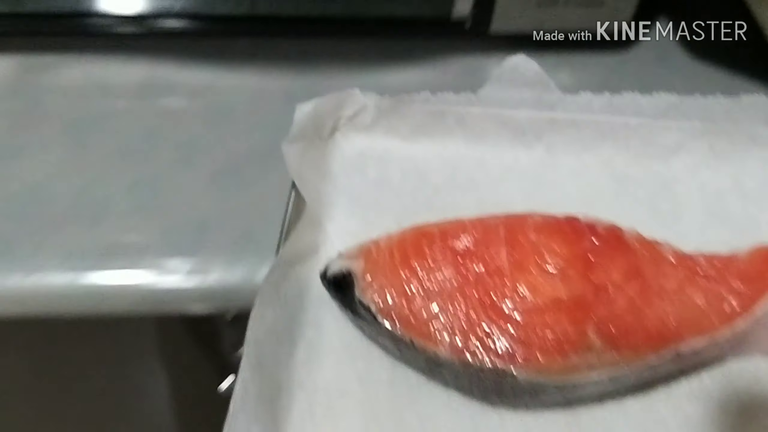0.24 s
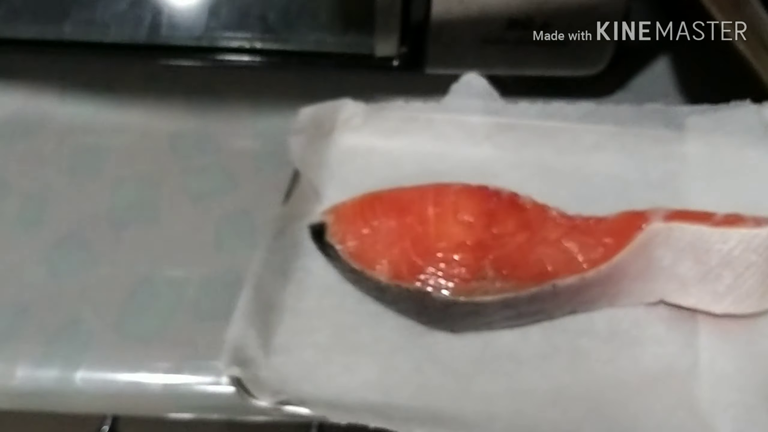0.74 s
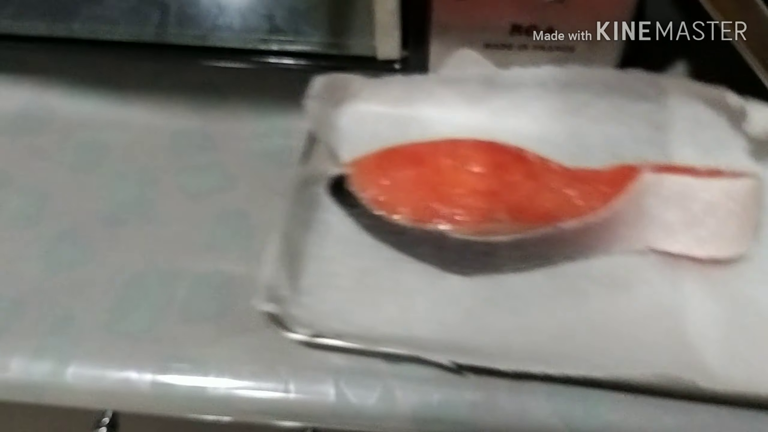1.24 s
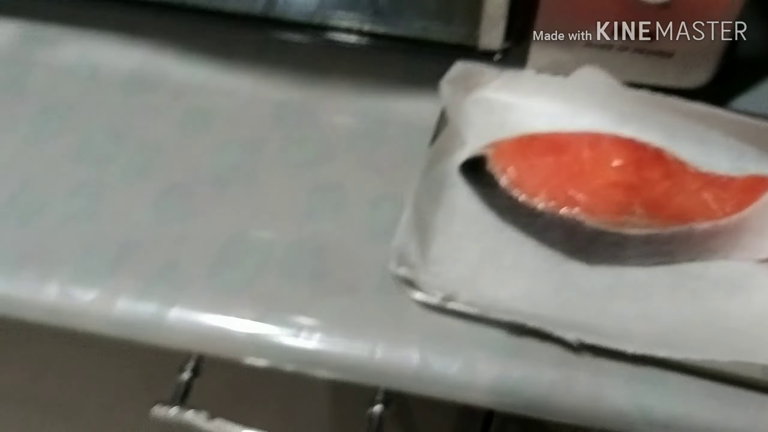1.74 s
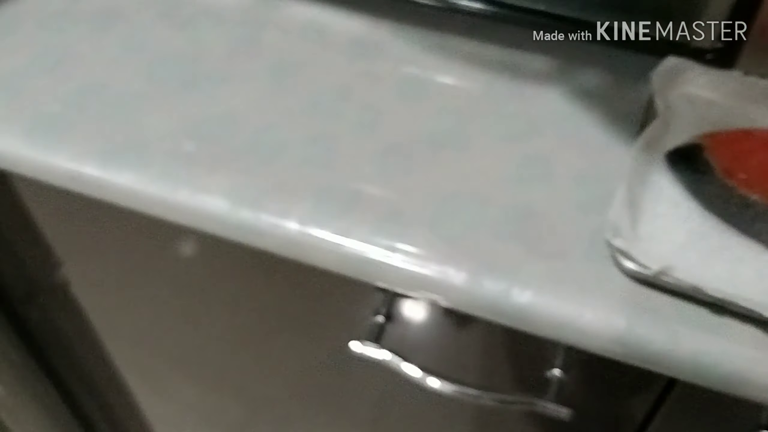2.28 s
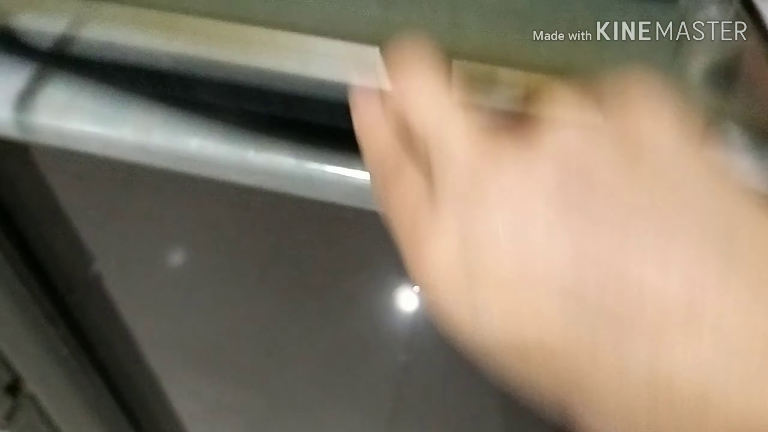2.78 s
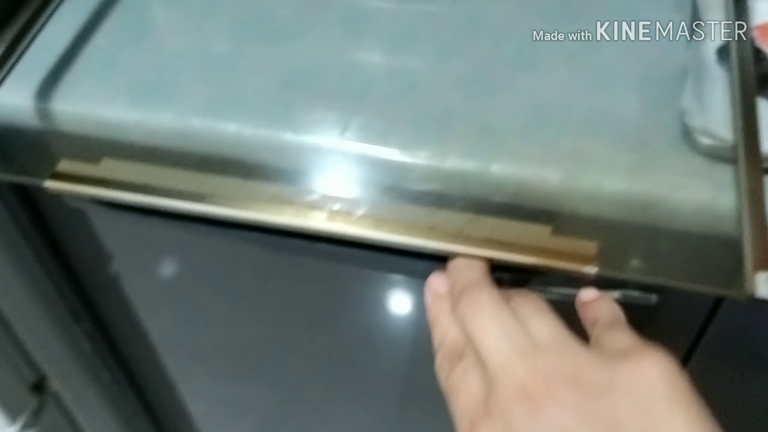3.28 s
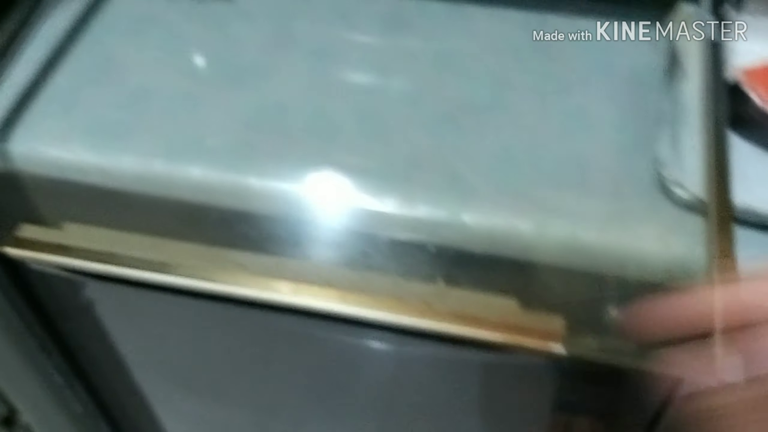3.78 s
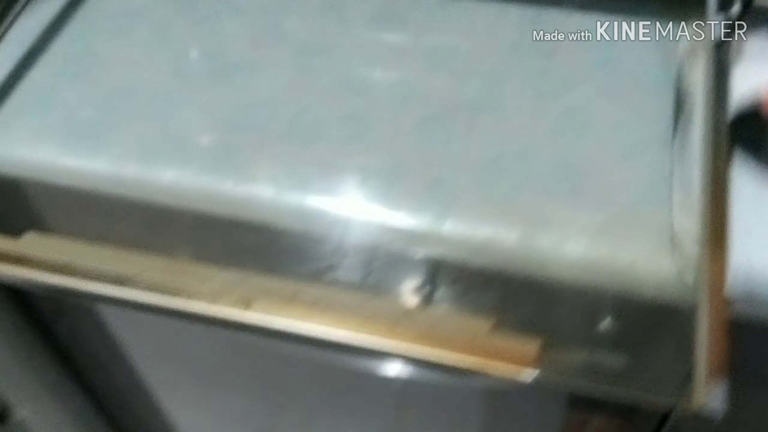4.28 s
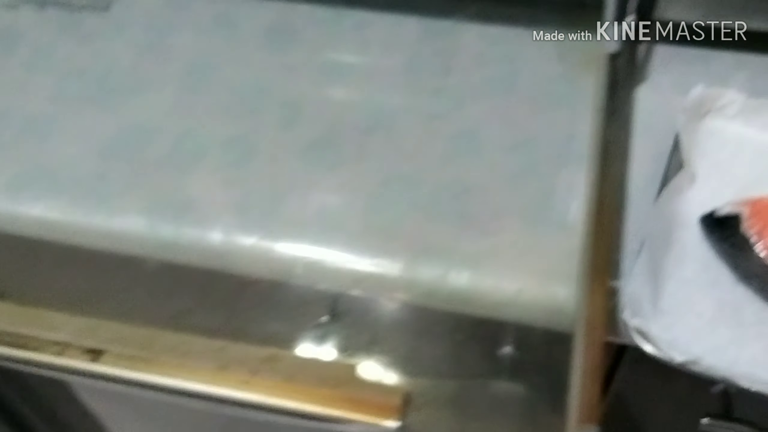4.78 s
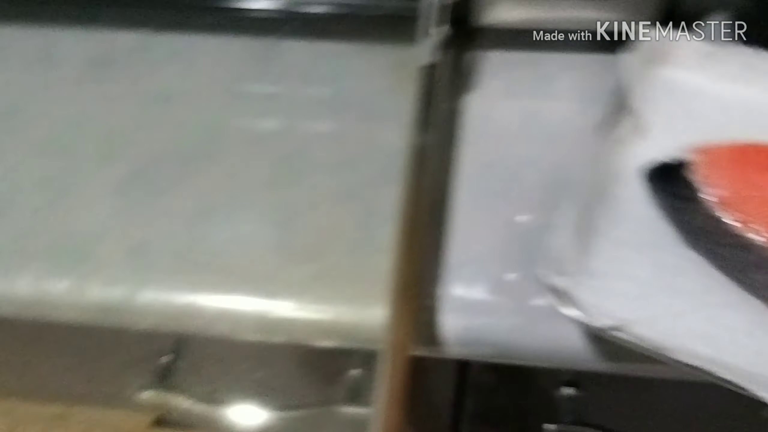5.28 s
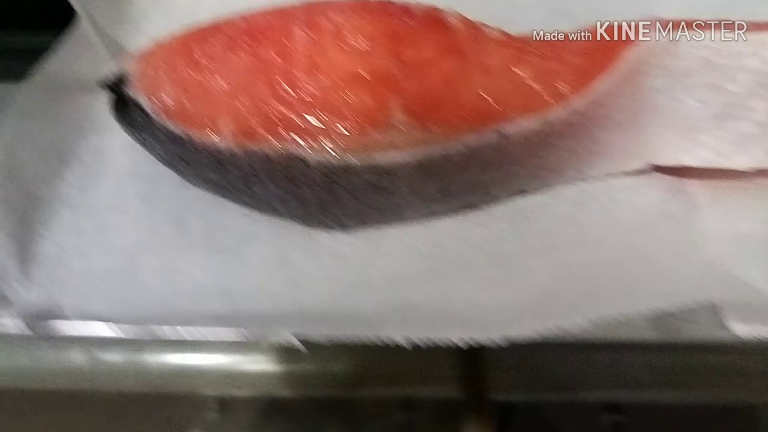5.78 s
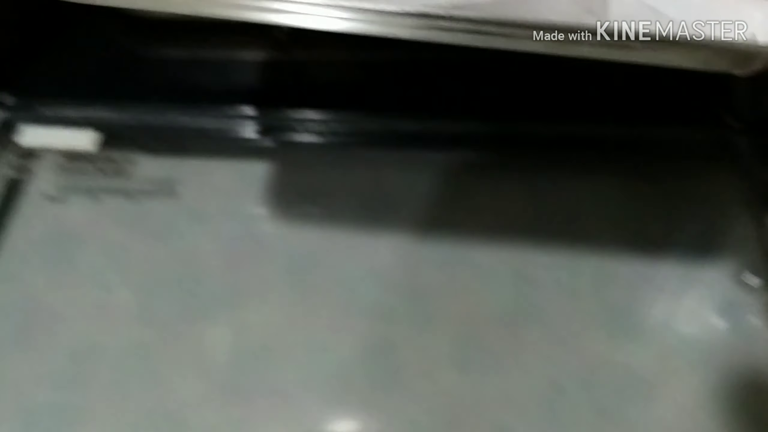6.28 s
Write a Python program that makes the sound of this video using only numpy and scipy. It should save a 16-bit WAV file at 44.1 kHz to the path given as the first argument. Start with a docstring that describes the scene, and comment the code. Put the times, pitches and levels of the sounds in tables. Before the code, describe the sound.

A thin metal tray knocks, bounces and scrapes on a counter, then an oven door squeaks faintly, booms and clatters down loudly in a small kitchen.

```python
"""A small hard kitchen, heard close at the counter over a low hum and microphone hiss in both ports.
A thin metal tray slides, knocks and bounces: blows ring its modes, and uneven slips make the rubbing.
A hand opens a small oven door: driven panels boom, stick-slip tones squeak at the hinge, then blows on
the door and chattering wires make it clatter down.
Last the tray is lifted, with small dry ticks of filtered noise, and meets the rack with further blows."""
import sys
import numpy as np
from scipy import signal
from scipy.io import wavfile
from scipy.ndimage import uniform_filter1d

SR = 44100
rng = np.random.default_rng(int(sys.argv[2]) if len(sys.argv) > 2 else 0)


def field_ratio(decibels):
    """Amplitude ratio for a level in dB (20 dB per decade); scalars and array-likes work."""
    return 10 ** (np.asarray(decibels, dtype=float) / 20)


def generate_wav(sig):
    """Save sig (samples, or channels by samples) to the path in sys.argv[1] as 16-bit PCM at SR."""
    pcm = np.round(np.clip(np.atleast_2d(sig).T, -1, 1) * 32767).astype(np.int16)
    wavfile.write(sys.argv[1], SR, pcm)


N = 287973  # length [samples]


def evened(x):
    """Scales a signal to rms 1."""
    return x / np.sqrt(np.mean(x ** 2) + 1e-20)


def read(points, hz):
    """Reads a curve of (frequency, value) points on a log-frequency axis."""
    f, value = np.transpose(points)
    return np.interp(np.log(hz + 1), np.log(f + 1), value)


def add(mix, s, sound):
    """Mixes a sound in at time s, cut at the end of the mix."""
    part = mix[round(s * SR):][:len(sound)]
    part += sound[:len(part)]


def resonate(x, hz, width):
    """A one-pole resonance of gain 1: shifts hz down to zero, smooths, and shifts back."""
    turn = np.exp(2j * np.pi * np.cumsum(hz * np.ones(len(x))) / SR)
    r = np.exp(-np.pi * width / SR)
    smooth = signal.lfilter([1 - r], [1, -r], x / turn + 1e-18)
    return 2 * (turn * smooth).real


def swell(s, db, rise, fall):
    """Start time, seconds from the peak, and a gain that climbs and fades straight in dB, ends softened."""
    swell_db, reach = 20, 1.5  # dB climbed or lost in one swell or fade time; such times followed
    t = np.arange(-min(reach * rise, s), reach * fall, 1 / SR)
    level_db = db - swell_db * np.maximum(-t / rise, t / fall)
    return s + t[0], t, field_ratio(level_db) * signal.windows.tukey(len(t), .1)


def rim(x):
    """Wire and rolled edges: a bank of narrow resonances, each weighted by its level and width."""
    # modes of the edges: (frequency [Hz], level [dB], time to die by 60 dB [s])
    edge_modes = [(813.31, -1, 0.049), (1980, 1, 0.022), (3220, -4, 0.029), (3680, -3.5, 0.044),
                  (4017, -1, 0.068), (4330, -10, 0.028)]
    out = 0
    for hz, db, t60 in edge_modes:
        width = 2.2 / t60  # Hz
        out = out + field_ratio(db) * resonate(x, hz, width) / np.sqrt(width)
    return out


def hum():
    """Room rumble and hiss as shaped noise; the bass drifts in patches, and the ports differ a little."""
    # colour of the background: (frequency [Hz], relative level per Hz [dB])
    background = [(20, -36), (40, -11.5), (70, -1.5), (180, -3.5), (350, -9), (650, -15.5), (1270, -25.5),
                  (2500, -26.5), (3700, -22.5), (6000, -26.5), (15500, -26.5)]
    # what the left port loses and the right gains, before the two shares below:
    # (frequency [Hz], level against the common noise [dB])
    port_difference = [(300, -53.5), (1300, -19.5), (5000, -23.5), (8000, -17.5), (10000, -12.5),
                       (11000, -21.5), (15000, -21.5)]
    level_db = -59  # rms over both ports
    frames, hz = N // 256 + 5, np.fft.rfftfreq(1024, 1 / SR)
    a, b, patches, c, d = rng.standard_normal((frames, 513, 5)).T
    patches = uniform_filter1d(patches, 8, 0)  # over neighbouring frequencies
    patches = evened(uniform_filter1d(patches, 20, 1))  # over time
    depth_db = .3 + 1.4 / (1 + (hz / 900) ** 2)
    colour = field_ratio(read(background, hz)[:, None] + depth_db[:, None] * patches)
    common, separate = a + 1j * b, c + 1j * d
    side = field_ratio(read(port_difference, hz))[:, None] * (1.15 * common + 1.2943 * separate)
    both = np.array([common - side, common + side]) * colour
    noise = signal.istft(both, nperseg=1024, noverlap=768)[1][:, :N]
    return field_ratio(level_db) * evened(noise)


def kitchen(x, count=3):
    """Echoes as sparse taps of random sign, each band dying at its own speed; several tails take turns."""
    # decay of the room: (frequency [Hz], time to die by 60 dB [s])
    decay = [(100, 0.2971), (700, 0.37), (4850, 0.39), (12000, 0.41)]
    out, clock = np.zeros(N), np.arange(N) / SR
    at = np.arange(160, SR // 2 - 20, 20)  # first echo after 160 samples or more, one in every 20
    for k in range(count):
        taps = np.zeros(SR // 2)
        taps[at + rng.integers(0, 20, len(at))] = rng.choice([-1., 1.], len(at))
        hz, t, z = signal.stft(taps, SR, nperseg=256)
        fade = field_ratio(-60 * t / read(decay, hz)[:, None])
        tail = signal.istft(z * fade, SR, nperseg=256)[1]
        # the tails swap at 2 Hz, so no single tail colours all echoes
        turn = np.sqrt(2 / count) * np.cos(np.pi * (4 * clock + k / count))
        out += signal.fftconvolve(x * turn, tail / np.linalg.norm(tail))[:N]
    return out


def hinge():
    """Stick-slip squeaks of hinge and spring: fuzzy tones that catch, hold their pitch and let go."""
    # squeaks: (start [s], length [s], level [dB], pitch [Hz])
    squeaks = [(2.21, 0.069, -62, 1047), (3.307, 0.12, -69, 1060), (3.523, 0.03927, -57.5, 1039),
               (3.572, .05, -62, 1053), (3.626, 0.04, -59, 1143), (3.799, 0.31, -77, 3540)]
    growth_db = 1  # gained over the length of a squeak
    out = np.zeros(N)
    for s, length, db, hz in squeaks:
        t = np.arange(0, length, 1 / SR)
        fuzz = evened(resonate(rng.standard_normal(SR // 2), hz, 50))[-len(t):]
        gain = field_ratio(db + growth_db * t / t[-1]) * signal.windows.tukey(len(t), .25)
        add(out, s, (1.2 * np.sin(2 * np.pi * hz * t) + .45 * fuzz) * gain)
    return out


def boom():
    """A hand or the hinge pushes door panel and cabinet: lumpy noise drives their low resonances."""
    # resonances of the panels: (frequency [Hz], width of the first of two passes [Hz], level [dB])
    panels = [(77, 54, 8.5), (219, 50, 0.5), (261, 184, 1.5), (371.5, 830, -6.5)]
    # pushes: (time of peak [s], level [dB], swell time [s], fade time [s], most favoured pitch [Hz])
    pushes = [(2.089, -54, 0.017, 0.049, 123), (2.259, -57, 0.04, 0.047, 147),
              (2.564, -45.5, 0.06, 0.043, 202), (2.7, -57.5, 0.629, 0.35, 157),
              (3.085, -40.5, 0.085, 0.17776, 137.2), (3.68, -47.5, 0.20495, 0.09145, 207),
              (3.809, -46.5, 0.053, 0.08744, 266), (3.92, -51.5, 0.12, 0.0746, 150),
              (4.08, -55.5, 0.096, 0.26, 202), (4.5, -49, 0.027, 0.0294, 200),
              (6.47, -43.5, 0.045, 0.18, 270)]
    favour_db = 6  # loss per octave away from the favoured pitch
    out, push = np.zeros(N), rng.standard_normal(N + SR)
    ringing = np.array([evened(resonate(resonate(push, hz, w), hz, 2 * w)) for hz, w, _ in panels])
    hz, _, db = np.transpose(panels)
    for *shape, favoured_hz in pushes:
        s, t, gain = swell(*shape)
        share = field_ratio(db - favour_db * abs(np.log2(hz / favoured_hz)))  # the spot pushed
        thud = share @ ringing[:, round(s * SR):][:, :len(t)] * gain
        add(out, s, evened(thud) * np.sqrt(np.mean(gain ** 2)))
    return out


def rattle():
    """Rack and door spring chatter: random knocks of loose wires ring the upper modes of the rim."""
    # bursts of chatter: (time of peak [s], level [dB], swell time [s], fade time [s])
    rattles = [(3.54, -54.5, .045, 0.047), (4.4, -43.5, .07, 0.099)]
    knocks_per_s, spread_db, centre_hz = 1600, 5.5, 3900
    out = np.zeros(N)
    for shape in rattles:
        s, t, gain = swell(*shape)
        chance, size, sign = rng.random((len(t), 3)).T
        strength = field_ratio(-spread_db * np.log(size + .05)) * np.sign(sign - .5)
        knocks = (chance < knocks_per_s / SR) * strength
        add(out, s, evened(resonate(rim(knocks), centre_hz, centre_hz / 2)) * gain)
    return out


def rubbing(slips_per_s, spread_db):
    """Sliding metal: dense uneven slips ring the rim; each stroke has its own tilt and grows duller."""
    # colour of the slips: (frequency [Hz], relative level per Hz [dB])
    grit_colour = [(300, 9), (1000, 1), (2500, -4), (3050, -2.5), (4800, -5.5), (6500, -19.5),
                   (15000, -18.5)]
    # slides, rubs and rattles: (time of peak [s], level [dB], swell time [s], fade time [s],
    # mean tilt [dB per octave])
    strokes = [(.19, -65, 0.56, 0.13, 0.5), (1.0, -56.5, 0.17, 0.2, -1), (1.17, -54, 0.1, 0.319, 0),
               (1.328, -60, 0.055, 0.17, 17), (1.45, -44, 0.16, 0.15, 0), (1.619, -53.5, 0.062, 0.088, 1.5),
               (2.16, -63, 0.2, 0.49, 8), (2.371, -65.5, 0.25, 0.0653, 7), (2.62, -59, .22, 0.39, -3.5),
               (3.65, -56, 0.18, 0.33, -2.5), (4.03, -57, 0.56, 0.052, 0.5), (4.38, -43.5, .15, 0.237, 1),
               (4.5, -56.5, 0.22, 0.48, -1), (4.819, -66.5, 0.03, 0.56, 1.5),
               (5.785, -54.5, .04, 0.037, 2.5), (6.47, -47, 0.046, 0.98, -3.5)]
    slow_tilt_db = 4.5  # a stroke starts this much brighter and ends this much duller, per octave
    rim_db = -18  # the rung rim under the slips
    out = np.zeros(N)
    for *shape, tilt_db in strokes:
        s, t, gain = swell(*shape)
        chance, size, sign = rng.random((len(t), 3)).T
        strength = field_ratio(-spread_db * np.log(size + 0.016)) * np.sign(sign - .5)
        slips = (chance < slips_per_s / SR) * strength
        f, frame, z = signal.stft(slips, SR, nperseg=256, noverlap=192)
        tilt_db = tilt_db + slow_tilt_db * (1 - 2 * frame / frame[-1])
        octaves = np.log2((np.minimum(f, 6000)[:, None] + 100) / 3000)  # the tilt stops at 6 kHz
        colour = field_ratio(read(grit_colour, f)[:, None] + tilt_db * octaves)
        colour /= np.sqrt((colour ** 2).mean(0))
        grit = signal.istft(z * colour, SR, nperseg=256, noverlap=192)[1][:len(t)] / slips.std()
        add(out, s, (grit + field_ratio(rim_db) * evened(rim(grit))) * gain)
    return out


def ticks():
    """Brief contacts: dying noise as a bare crack, through one broad resonance, and ringing the rim."""
    # small dry ticks of rim, paper and latch: (time [s], peak of the resonant part [dB], centre [Hz])
    contacts = [(1.168, -43.5, 4480), (1.195, -34.5, 3040), (1.196, -36, 9700), (1.408, -36, 4440),
                (1.603, -43, 5100), (1.614, -44, 3900), (2.358, -50, 4300), (2.908, -46.5, 4600),
                (3.622, -52, 4500), (4.301, -39, 8000), (5.709, -31, 3900), (5.719, -52, 4000),
                (5.756, -48, 3270)]
    contact_s, ring_db = 0.0021, -15  # decay constant of the noise; rim against the resonant part
    out, t = np.zeros(N), np.arange(4000) / SR
    for s, db, hz in contacts:
        crack = rng.standard_normal(len(t)) * np.exp(-t / contact_s)
        snap = resonate(resonate(crack, hz, .4 * hz), hz, .6 * hz)
        ring = rim(crack)
        sound = snap / abs(snap).max() + crack / abs(crack).max()
        sound += field_ratio(ring_db) * ring / abs(ring).max()
        add(out, s, field_ratio(db) * sound)
    return out


def clear_modes(modes, t, tilt_db, damping):
    """The modes that stand out: dying sines of random strength, broken up by loose contact."""
    detune, buzz_db = .01, 3  # spread of pitch as a share; unevenness of a ring before smoothing
    hz, db, t60 = np.transpose(modes)[:, :, None]
    strength = rng.uniform(.3, 1, hz.shape) * rng.choice([-1, 1], hz.shape)
    shift = 1 + detune * rng.standard_normal(hz.shape)  # each blow draws its pitches slightly off
    steps = field_ratio(buzz_db * rng.standard_normal((len(hz), len(t) // 400 + 1)))
    buzz = uniform_filter1d(np.repeat(steps, 400, 1), 300, 1)[:, :len(t)]
    level_db = db + tilt_db * np.log2(hz / 1000) - 60 * t / (t60 * damping)
    return (strength * field_ratio(level_db) * np.sin(2 * np.pi * hz * shift * t) * buzz).sum(0)


def mode_crowd(skin, t, tilt_db, t60_at_1k):
    """Modes too dense to part, heard as noise whose treble dies sooner."""
    f, frame, z = signal.stft(rng.standard_normal(len(t)), SR, nperseg=512, noverlap=448)
    f = np.maximum(f, 60)[:, None]
    # random unevenness over frequency, new for each blow, gives a knocky colour
    z *= field_ratio(3 * rng.standard_normal(f.shape))
    t60 = t60_at_1k * (f / 1000) ** -.3
    level_db = read(skin, f) + tilt_db * np.log2(f / 1000) - 60 * frame / t60
    crowd = signal.istft(z * field_ratio(level_db), SR, nperseg=512, noverlap=448)[1][:len(t)]
    chatter = uniform_filter1d(uniform_filter1d(rng.standard_normal(len(t)), size=90), size=60)
    return crowd * field_ratio(1.8 * evened(chatter))  # loose parts chatter


def blows(rows, modes, skin, modes_db, t60_at_1k):
    """Each blow rings a few clear modes and a dense crowd, building up as contact is made."""
    treble_rise = 0.25  # the treble builds up in this share of the rise time
    out, t = np.zeros(N), np.arange(SR // 4) / SR
    high = signal.butter(2, 2500, "high", fs=SR, output="sos")
    for s, peak_db, tilt_db, damping, rise in rows:
        sound = field_ratio(modes_db) * clear_modes(modes, t, tilt_db, damping)
        sound += mode_crowd(skin, t, tilt_db, t60_at_1k * damping)
        treble = signal.sosfilt(high, sound)
        sound = (sound - treble) * np.tanh(t / rise) + treble * np.tanh(t / (treble_rise * rise))
        envelope_peak = np.sqrt(uniform_filter1d(sound ** 2, 400).max())
        add(out, s, field_ratio(peak_db) * sound / (2 * envelope_peak))
    return out


def door():
    """Oven door, frame and rack: struck metal with low panel modes and a bright crowd."""
    # blows: (time [s], twice the peak rms envelope [dB], tilt [dB per octave],
    # factor on ring times, rise time constant [s])
    door_blows = [(2.525, -39, -8.5, 0.42, 0.03078), (2.848, -46.5, -5.5, 0.39, 0.0066),
                  (3.053, -37.5, 2, 1.16, 0.001903), (3.305, -45.5, 0, 2, 0.0014),
                  (3.62, -45.5, -0.5, 1.3, 0.0026), (4.049, -41.5, -6.5, 0.5, 0.0014),
                  (4.229, -46, 3.5, 0.424, 0.0032), (4.258, -39, -1, 1, 0.0066),
                  (4.303, -23.5, -0.5, 1.77, 0.0026), (4.34, -31.5, 1, 0.99, 0.0046),
                  (4.365, -26, 1, 1.02, 0.0055), (4.40, -30.5, 1, 0.39, 0.0028),
                  (6.499, -33, 1.5, 1.2, 0.0093)]
    # clear modes: (frequency [Hz], level [dB], time to die by 60 dB at ring factor 1 [s])
    door_modes = [(82.6, -17, 0.56), (266, -2, 0.16), (540, 5, 0.0792), (709.55, -1.5, 0.23),
                  (1021, 1, 0.25), (1157, 4, 0.14), (779.5, 6.5, 0.21), (1970, -7.5, 0.44),
                  (2240, -9, 0.31), (3690, -6, 0.24), (4415.7, -8, 0.17)]
    # dense modes: (frequency [Hz], relative level per Hz [dB])
    door_skin = [(60, -14.5), (276, 1.5), (750, 4), (1400, -1), (2850, -3.5), (4100, -3), (6500, -14),
                 (15000, -22.5)]
    return blows(door_blows, door_modes, door_skin, modes_db=-13.5, t60_at_1k=0.21)


def tray():
    """Thin metal tray: knocks and bounces ring the modes of the sheet."""
    # blows: (time [s], twice the peak rms envelope [dB], hardness as tilt [dB per octave],
    # damping as a factor on ring times, rise time constant [s])
    tray_blows = [(.867, -17, -3.5, 0.33, 0.0026), (.885, -33.5, 0.5, 0.96, 0.016),
                  (.961, -25, -3, 0.51, 0.0021), (1.011, -34, -2.5, 0.54, 0.0054),
                  (1.069, -30, -4, 0.49, 0.0072), (1.311, -39, 6.5, 0.74, 0.00065),
                  (1.343, -41.5, 11.5, 0.95, 0.0016), (1.364, -38, -11, 0.09, 0.0024),
                  (1.416, -27, 7.5, 0.73, 0.0014), (1.42, -25, -5, 0.2997, 0.004002),
                  (1.432, -31.5, -5, 0.23, 0.0013), (1.453, -34, 2, 0.37, 0.0015),
                  (5.708, -42.5, 5, 0.3, 0.00051), (6.434, -31.5, 3.5, 1, 0.0022)]
    # clear modes: (frequency [Hz], level [dB], time to die by 60 dB at ring factor 1 [s])
    tray_modes = [(533, 4, 0.092), (712, 0.5, 0.16), (824, 5, 0.1283), (881, 3.5, 0.16), (1006, 4, 0.13),
                  (1063, -3, 0.2), (1410, 0, 0.22), (1692, -6.5, 0.3), (1930, -4.5, 0.22),
                  (2238.4, -12, 0.39)]
    # dense modes of the sheet: (frequency [Hz], relative level per Hz [dB])
    tray_skin = [(100, -37.5), (300, -13), (520, -4), (1300, -2.5), (2230, -2.5), (2900, -8.5), (4200, -9),
                 (6500, -23), (15000, -38.5)]
    return blows(tray_blows, tray_modes, tray_skin, modes_db=-15.5, t60_at_1k=0.22)


def scene():
    """Tray and door near the microphone, the kitchen around them, hum and hiss beneath."""
    near = hinge() + boom() + rattle() + rubbing(slips_per_s=4000, spread_db=4.5) + ticks()
    near += door() + tray()
    # a high-pass at 70 Hz keeps deep thumps out of the near sounds
    near = signal.sosfilt(signal.butter(3, 70, "high", fs=SR, output="sos"), near)
    # the microphone dulls the top
    near = signal.sosfilt(signal.butter(1, 10900, fs=SR, output="sos"), near)
    return hum() + field_ratio(-6.0) * kitchen(near) + near


def top_cut(x):
    """Nothing passes above the cut-off."""
    return signal.sosfilt(signal.butter(12, 15600, fs=SR, output="sos"), x)


def record(dry):
    """Takes down the finished mix of both ports."""
    return top_cut(dry)


dry = scene()
out = record(dry)
generate_wav(out)
```